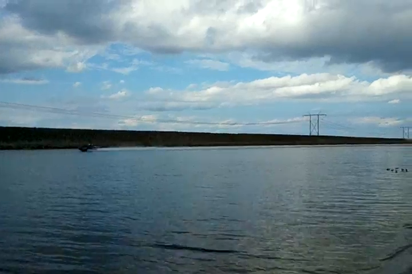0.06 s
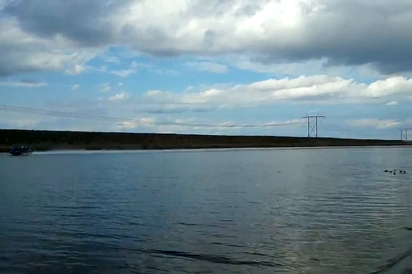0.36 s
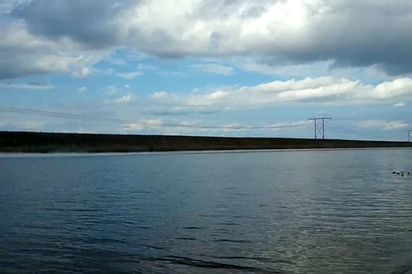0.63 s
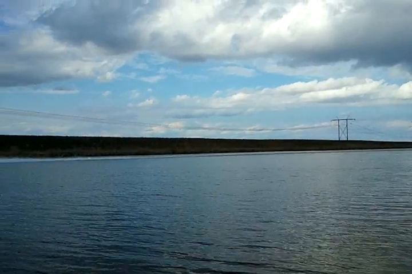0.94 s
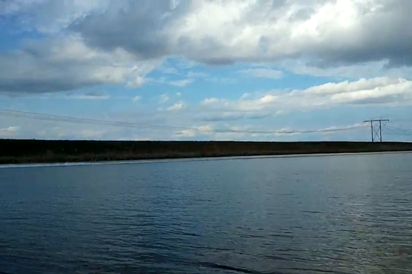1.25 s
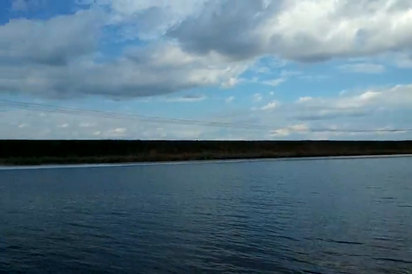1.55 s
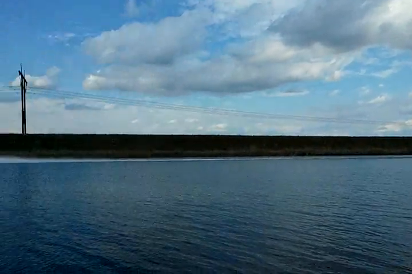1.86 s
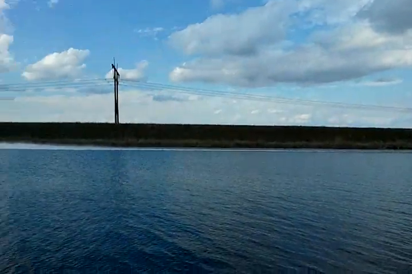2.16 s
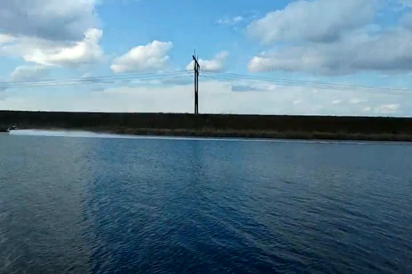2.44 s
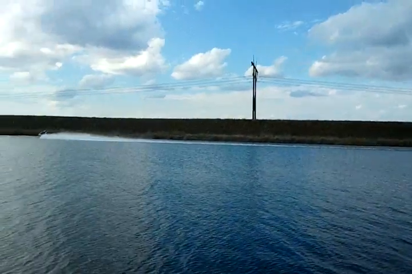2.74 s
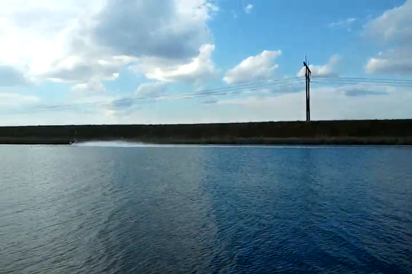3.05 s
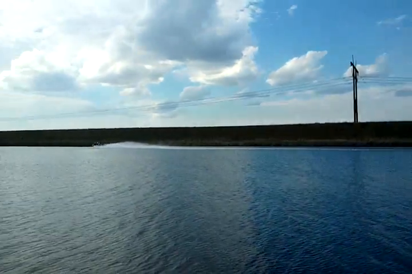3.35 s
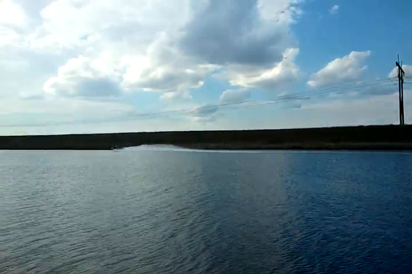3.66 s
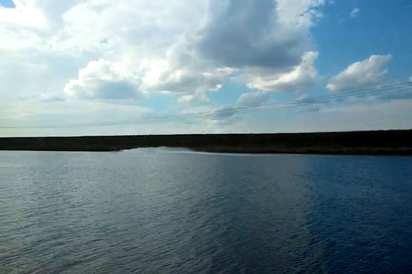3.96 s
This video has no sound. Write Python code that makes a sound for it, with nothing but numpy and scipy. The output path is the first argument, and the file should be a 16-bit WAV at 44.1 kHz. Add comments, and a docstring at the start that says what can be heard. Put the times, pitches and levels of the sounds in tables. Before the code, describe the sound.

A fast motorboat passes on open water with rushing spray, light hull slaps and a brief thin whistle. Its engine note falls and settles into a low drone while wind gusts buffet the microphone.

```python
"""On open water, a fast motorboat passes: its engine note falls and settles into a low drone.
Turbulent exhaust roar and crackling spray dull as it turns its stern; the hull slaps the water
and a thin whistle glides by. Gusts of wind buffet the microphone and briefly overload it."""
import sys
import numpy as np
from scipy import signal
from scipy.fft import rfft, irfft
from scipy.io import wavfile
from scipy.ndimage import uniform_filter1d

SR = 44100
rng = np.random.default_rng(int(sys.argv[2]) if len(sys.argv) > 2 else 0)


def generate_wav(sig):
    """Save sig (samples, or channels by samples) to the path in sys.argv[1] as 16-bit PCM at SR."""
    pcm = np.round(np.clip(np.atleast_2d(sig).T, -1, 1) * 32767).astype(np.int16)
    wavfile.write(sys.argv[1], SR, pcm)


N = 176400
T = np.arange(N) / SR
HZ = np.fft.rfftfreq(N, 1 / SR)


def amp(db):
    """Decibels to amplitude ratio."""
    return 10 ** (np.asarray(db) / 20)


def unit(x):
    """Normalisation to rms 1."""
    return x / np.sqrt(np.mean(x ** 2) + 1e-20)


def curve(rows, column=1):
    """Linear interpolation of a time table at every sample."""
    rows = np.array(rows)
    return np.interp(T, rows[:, 0], rows[:, column])


def colour(x, rows, column=1):
    """Spectral shaping by one column of a table, at rms 1."""
    rows = np.array(rows)
    gain_db = np.interp(np.log(HZ + 1), np.log(rows[:, 0]), rows[:, column])
    return unit(irfft(rfft(x) * amp(gain_db), N))


def blend(x, rows, position):
    """Crossfade through the spectra of a table; position 0 is the first."""
    return sum(np.sqrt(np.maximum(1 - abs(position - k), 0)) * colour(x, rows, column=k + 1)
               for k in range(len(rows[0]) - 1))


def drift(hz):
    """Low-pass noise: random motion up to about hz, at rms 1."""
    return unit(irfft(rfft(rng.standard_normal(N)) * np.exp(-(HZ / hz) ** 2), N))


def patchy(x, depth_db, width_hz, length_s):
    """Random modulation in time and frequency: patches of the spectrum swell and fade."""
    f, t, spectra = signal.stft(x, SR, nperseg=512, noverlap=384)
    across = np.fft.fftfreq(len(f), f[1])[:, None] * width_hz * 2
    along = np.fft.fftfreq(len(t), t[1]) * length_s * 2
    blur = np.exp(-across ** 2 - along ** 2)
    field = unit(np.fft.ifft2(np.fft.fft2(rng.standard_normal(spectra.shape)) * blur).real)
    return unit(signal.istft(spectra * amp(depth_db * field), SR, nperseg=512, noverlap=384)[1][:N])


# Breeze at the microphone. Each row: time in seconds, level in dB.
BREEZE_DB = [(0, -30), (.2, -20), (.33, -24.5), (.55, -32.5), (.66, -23), (.8, -30.5), (.97, -22),
             (1.42, -29), (1.8, -30.5), (1.94, -12.5), (2.4, -18.5), (2.9, -17.5), (3.24, -22.5),
             (3.33, -32), (3.62, -25), (3.74, -37), (4, -42)]
# Gusts. Each row: peak time in seconds, fall in seconds, level in dB, brightness from 0 to 2.
GUSTS = [(0.028, 0.014, -13, .3), (.145, .043, -12, 0.76), (.236, 0.018, -6, 1.15), (.618, 0.011, -19, .8),
         (.899, .006, -11, 0.81), (1.02, 0.017, -15.5, 0.6), (1.116, 0.021, -14.5, 0.66),
         (1.183, 0.029, -11, 0.84), (1.963, .008, .5, 1.7), (1.976, .012, -2.5, 1), (2.0, 0.021, -5, .9),
         (2.053, .018, -3.5, .7), (2.175, .011, -7.5, 1), (2.289, .007, -7, 1), (2.321, .023, -5, 0.67),
         (2.665, .018, -13.5, .2), (2.803, .02, -9.5, 0.63), (2.83, .007, -11, 1.4),
         (3.158, .022, -12.5, .6)]
# Wind spectra. Each row: frequency in Hz, density in dB when dull, strong and sharp.
WIND_SPECTRA = [(15, -9, -17, -16), (34.3, -1, -3.5, -7), (75, 3.5, 1.5, -1), (121, 2, 1.5, 0),
                (215, -6, 3.5, 2), (326, -14.5, -6.5, -1), (494, -28, -12, -5), (890, -39.5, -23, -15),
                (1670, -46, -38.5, -28), (3000, -64, -51, -50), (8000, -75.5, -74, -75)]


def wind():
    """Turbulent pressure at the microphone: a lumpy rumble coloured by the breeze and gusts, each weighted by
    its power."""
    power = amp(curve(BREEZE_DB) + 2.5 * drift(28)) ** 2
    weighted_brightness = 0.2 * power
    for peak, fall, db, brightness in GUSTS:
        rise = 1.06 * fall / (1 + brightness)  # bright gusts strike faster
        gust = amp(db) ** 2 * np.exp(-((T - peak) / np.where(T < peak, rise, fall)) ** 2)
        power += gust
        weighted_brightness += brightness * gust
    eddies = blend(rng.standard_normal(N), WIND_SPECTRA, np.clip(weighted_brightness / power, 0, 2))
    return eddies * np.sqrt(power / uniform_filter1d(eddies ** 2, size=1000))


def splashes(drops_per_s=1500, spread_db=4.5, drop_share=0.37):
    """Shot noise: dense drops of uneven size over a smooth wash."""
    size = amp(spread_db * np.minimum(rng.exponential(1, N), 4.5))
    drops = size * (rng.random(N) < drops_per_s / SR) * rng.choice([-1, 1], N)
    return np.sqrt(drop_share) * unit(drops) + np.sqrt(1 - drop_share) * rng.standard_normal(N)


# Rushing water and fine spray. Each row: frequency in Hz, density in dB from bow, broadside and stern.
RUSH_SPECTRA = [(300, -23, -14.5, -13), (656, -4.5, -10, 0.5), (910, 0, -5, 0), (1180, -1.5, 3, 0.5),
                (1550, -3.5, -2.5, -1.5), (1900, -1.5, -5, -1.5), (2384, -2, -1, -8),
                (2780, -7.5, -13.5, -13), (2970, -3, -17.5, -13), (3440, -8.5, -15, -22),
                (3780, -22.5, -16.5, -18.5), (5000, -30, -33, -29.5), (9000, -50.5, -46.5, -50)]
SPRAY_SPECTRA = [(1500, -13.5, -15, -21), (3030, -10.5, -6, 0), (4040, -9, 3.5, -4), (4450, -2.5, -4.5, -3),
                 (5060, -1.5, 4, -0.5), (5300, -6, -0.5, -2), (5870, 1, 2, 1), (6760, 4, 1.5, 0.5),
                 (7270, 1.5, -0.5, 1.5), (8060, -1.5, -8, -6.5), (8450, -13.5, -15, -20.5),
                 (8860, -28.5, -34.5, -38)]
# Their envelopes. Each row: time in seconds, level in dB.
RUSH_DB = [(0, -26.5), (.11, -25.5), (.3, -29), (.42, -25.5), (.48, -33.5), (.65, -29.5), (.85, -31),
           (1.05, -31), (1.38, -30.5), (1.47, -33), (1.68, -36), (1.74, -31.5), (1.84, -39.5), (2.2, -39),
           (2.6, -41.5), (3.2, -38), (3.4, -38), (3.6, -37), (3.75, -41), (4, -39.5)]
SPRAY_DB = [(0, -38), (.11, -33.5), (.3, -36.5), (.42, -31), (.49, -40), (.67, -37.5), (.85, -37.5),
            (1.3, -36), (1.48, -40.5), (1.74, -37.5), (1.85, -46.5), (2.1, -48), (2.5, -49.5), (2.74, -54),
            (2.8, -48), (3.1, -54.5), (3.8, -56), (4, -54)]


def water(aspect):
    """Splash noise: the hull tears the water and throws spray; both surge together."""
    surge = drift(55) * np.exp(-.5 * aspect)
    rush = blend(splashes(), RUSH_SPECTRA, aspect)
    rush = patchy(rush, depth_db=1.5, width_hz=260, length_s=.05)
    spray = blend(splashes() + rng.standard_normal(N), SPRAY_SPECTRA, aspect)
    spray = patchy(spray, depth_db=0.95, width_hz=230, length_s=0.073)
    return rush * amp(curve(RUSH_DB) + 1.8 * surge) + spray * amp(curve(SPRAY_DB) + 0.98 * surge)


# Hull slaps. Each row: start in seconds, level in dB.
HULL_SLAPS = [(0.417, -20), (.527, -18), (0.951, -15), (1.101, -13), (1.331, -18.5), (1.379, -17),
              (1.589, -18.5), (1.728, -13), (1.759, -19)]


def slaps(rise_s=0.00083, decay_s=0.0027):
    """Impact noise: the hull meets ripples in short cracks that decay exponentially."""
    envelope = np.zeros(N)
    for start, db in HULL_SLAPS:
        age = np.maximum(T - start, 0)
        envelope += amp(db) * np.minimum(age / rise_s, 1) * np.exp(-age / decay_s)
    rush = colour(rng.standard_normal(N), RUSH_SPECTRA, column=2)
    spray = colour(rng.standard_normal(N), SPRAY_SPECTRA, column=2)
    return envelope * (rush + amp(-10.5) * spray)


# Whine of the drive. Each row: time in seconds, frequency in Hz, level in dB.
WHISTLE_GLIDE = [(1.48, 6890, -52), (1.56, 6784, -38), (1.65, 6693, -37.5), (1.72, 6635, -31),
                 (1.8, 6510, -36.5), (1.85, 6492, -50), (1.98, 6370, -44), (2.065, 6260, -40),
                 (2.12, 6230, -75)]


def whistle(jitter=0.0128, flutter_db=4):
    """Frequency and amplitude modulation: the drive's thin whine wavers and falls as the boat goes by."""
    hz = curve(WHISTLE_GLIDE) * (1 + jitter * drift(450))
    sounding = (T > WHISTLE_GLIDE[0][0]) & (T < WHISTLE_GLIDE[-1][0])
    level = amp(curve(WHISTLE_GLIDE, column=2) + flutter_db * drift(110))
    return sounding * level * np.sqrt(2) * np.sin(2 * np.pi * np.cumsum(hz) / SR)


# Exhaust rasp. Each row: time in seconds, centre frequency in Hz, level in dB.
RASP_RESONANCE = [(0, 850, -42), (.3, 850.6, -35), (.55, 861, -36), (.68, 920, -28), (.8, 910, -37),
                  (1.2, 906, -39), (1.6, 880, -58.5), (3.25, 903, -58), (3.44, 905, -38), (3.7, 900, -51)]


def rasp(width_hz=28, skirt_hz=190):
    """Resonance: exhaust turbulence excites a narrow peak with a broad skirt."""
    carrier = np.exp(2j * np.pi * np.cumsum(curve(RASP_RESONANCE)) / SR)
    peak = drift(width_hz) + 1j * drift(width_hz)
    skirt = 1.4 * (drift(skirt_hz) + 1j * drift(skirt_hz))
    return unit(((peak + skirt) * carrier).real) * amp(curve(RASP_RESONANCE, column=2))


# Exhaust roar. Each row: frequency in Hz, density in dB from bow, broadside and stern.
ROAR_SPECTRA = [(30, 3, -7, -2), (130, -10.5, -15, -6), (231, -11, -0.5, -6), (300, -15.5, 0, -1.5),
                (394, 4.5, 2.5, -3.5), (501, -1.5, -2, -4), (604, -21, -17.5, -11), (740, -22, -20, -10.5),
                (810, -10, -14, -10), (1130, -17, -13.5, -24.5), (2000, -32, -34.5, -30.5),
                (4000, -55, -57, -57)]
# Its envelope. Each row: time in seconds, level in dB.
ROAR_DB = [(0, -22.5), (.35, -20.5), (.6, -27.5), (.9, -24.5), (1.15, -25.5), (1.4, -26), (1.8, -30.5),
           (2.3, -31), (2.8, -36), (3.4, -32), (4, -30.5)]


def roar(cycles, aspect, throb=0.33):
    """Amplitude modulation: turbulent exhaust is puffed out at the firing rate."""
    puffs = rng.standard_normal(N) * (1 + throb * np.cos(2 * np.pi * cycles))
    return blend(puffs, ROAR_SPECTRA, aspect) * amp(curve(ROAR_DB) + drift(28))


# Engine firing as heard. Each row: time in seconds, rate in Hz.
FIRING_HZ = [(0, 293.3), (.45, 286.3), (.8, 276.9), (1.1, 262.5), (1.35, 253.5), (1.5, 233.1),
             (1.62, 216.4), (1.77, 197.1), (1.95, 181.3), (2.2, 175.9), (2.7, 173.1), (3.05, 170.6),
             (3.35, 167.7), (3.65, 170), (3.85, 174.9), (4, 180.5)]
# Exhaust partials. Each row: multiple of the firing rate, level in dB from bow, broadside and stern.
PARTIALS = [(1, 0, -.5, 0), (4 / 3, -3.5, -22, -32), (3 / 2, -7.5, -9, -29), (2, -19, -6.5, -7.2),
            (5 / 2, -23, -12, -24.5), (3, -15, -15, -18.5), (7 / 2, -19, -16.5, -28),
            (4, -14.5, -20.5, -23.5), (6, -25, -20, -35)]
# Envelope of the engine note. Each row: time in seconds, level in dB.
ENGINE_DB = [(0, -33), (.5, -29), (.7, -32.5), (.9, -35), (1.3, -30), (1.55, -26), (1.8, -22.5),
             (2.1, -19.5), (2.6, -19.5), (3.1, -20), (3.5, -19), (3.9, -19), (4, -22)]
# Emphasis of partials above twice the firing rate. Each row: time in seconds, gain in dB.
OVERTONE_DB = [(2.6, 0), (3.2, 5), (3.42, -0.5), (3.65, -6.5), (4, 1)]


def engine(cycles, aspect):
    """Source and filter: firing partials slide through a pipe resonance and an interference notch."""
    pipe_hz, pipe_width_hz = 476.4, 31
    notch_hz, notch_width_hz = 670, 110  # the reflection off the water cancels this band
    note = np.zeros(N)
    for multiple, *side_db in PARTIALS:
        hz = multiple * curve(FIRING_HZ)
        pipe_db = 4 * np.exp(-((hz - pipe_hz) / pipe_width_hz) ** 2)
        notch_db = -10.5 * np.exp(-((hz - notch_hz) / notch_width_hz) ** 2)
        directivity_db = np.interp(aspect, [0, 1, 2], side_db)
        level_db = directivity_db + pipe_db + notch_db + (multiple > 2) * curve(OVERTONE_DB)
        flutter_db = np.sqrt(multiple) * drift(7.4)
        rough_db = .9 * np.log2(multiple + .5) * drift(61)  # uneven firing
        scatter = .028 * (multiple - 1) * drift(30)
        phase = 2 * np.pi * (multiple * cycles + scatter + rng.random())
        note += amp(level_db + flutter_db + rough_db) * np.cos(phase)
    return np.sqrt(2) * note * amp(curve(ENGINE_DB))


# Side that the boat shows. Each row: time in seconds, aspect (0 bow, 1 broadside, 2 stern).
ASPECT = [(0, 0), (.45, 0.0046), (.75, 0.98), (1.35, 1), (1.78, 1.016), (2.3, 1.95), (3.2, 2)]


def scene():
    """Superposition of boat, water and wind at one microphone."""
    aspect = np.clip(curve(ASPECT), 0, 2)
    firing_hz = curve(FIRING_HZ) * (1 + 0.004113 * drift(18.9))  # the pitch wavers slightly
    cycles = np.cumsum(firing_hz) / SR
    exhaust = engine(cycles, aspect) + roar(cycles, aspect) + rasp()
    return (exhaust + water(aspect) + slaps() + whistle() + wind())[None]


def record(dry):
    """Soft clipping: the slightly off-centre input flattens in the gusts, then is band-limited."""
    offset, ceiling, hardness, cutoff_hz = -0.079, 0.75, 4.8, 8850
    biased = dry + offset
    clipped = biased / (1 + abs(biased / ceiling) ** hardness) ** (1 / hardness)
    lowpass = signal.firwin(401, cutoff_hz, window=("kaiser", 9), fs=SR)
    return signal.oaconvolve(clipped, lowpass[None], "same")


dry = scene()
out = record(dry)
generate_wav(out)
```